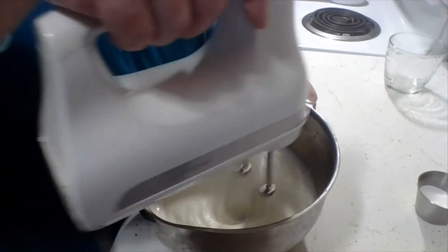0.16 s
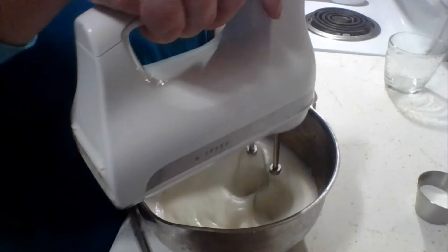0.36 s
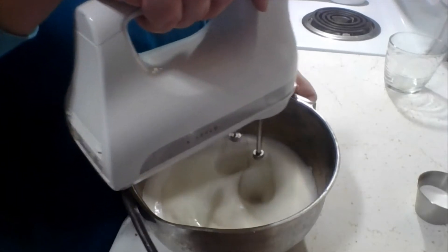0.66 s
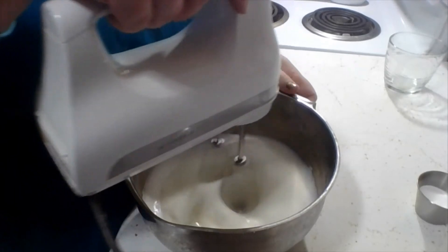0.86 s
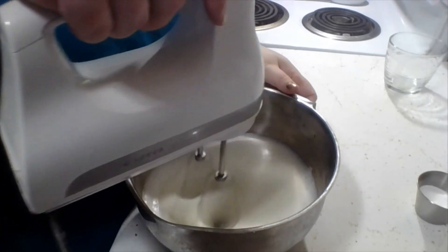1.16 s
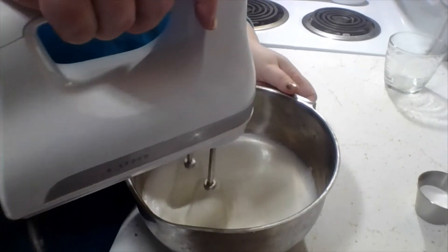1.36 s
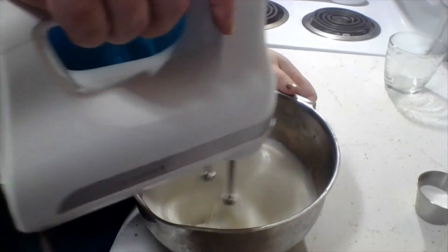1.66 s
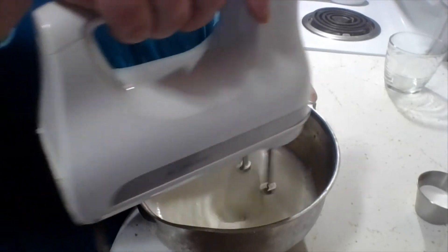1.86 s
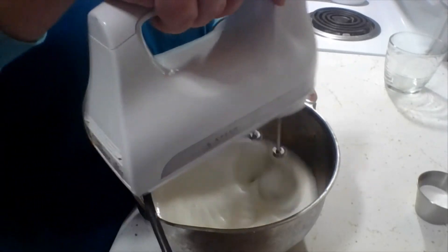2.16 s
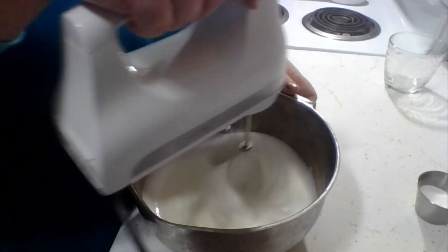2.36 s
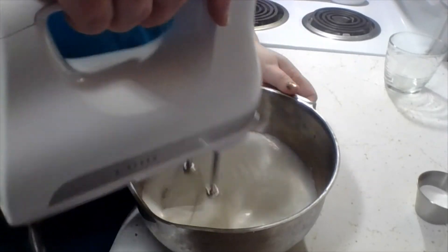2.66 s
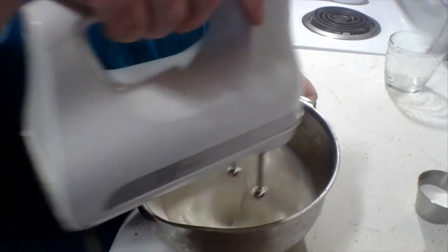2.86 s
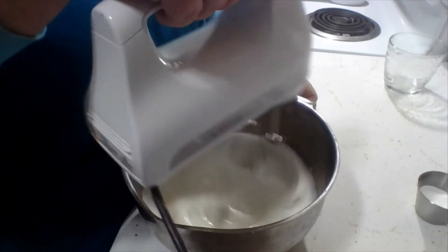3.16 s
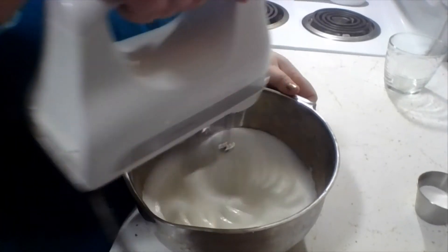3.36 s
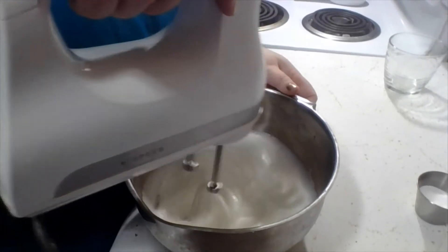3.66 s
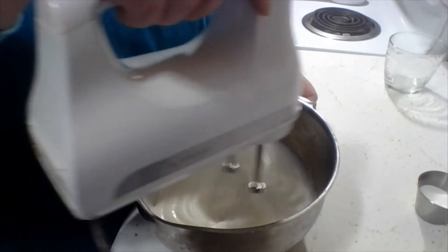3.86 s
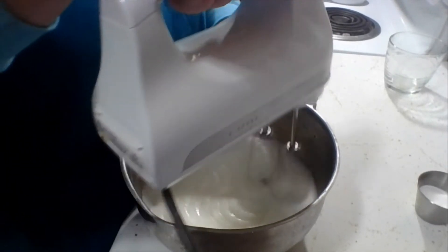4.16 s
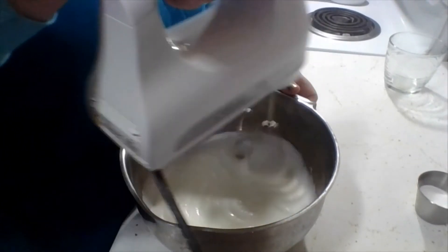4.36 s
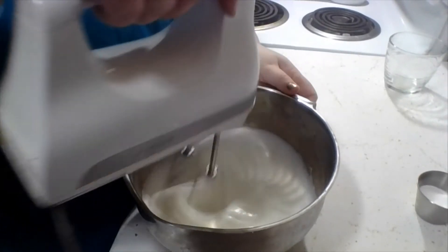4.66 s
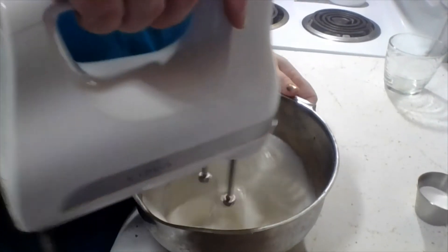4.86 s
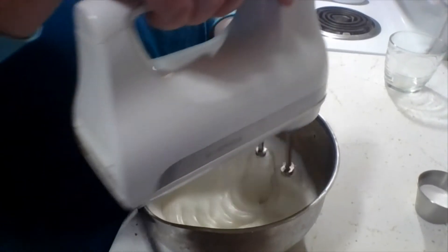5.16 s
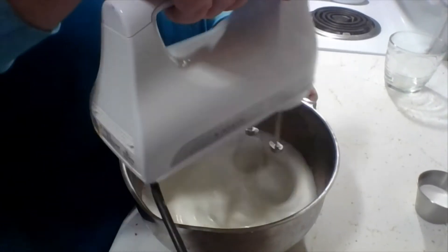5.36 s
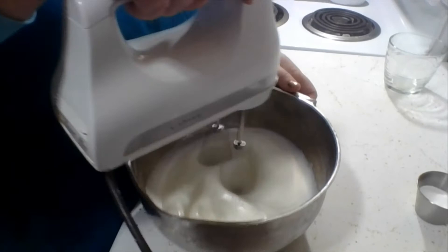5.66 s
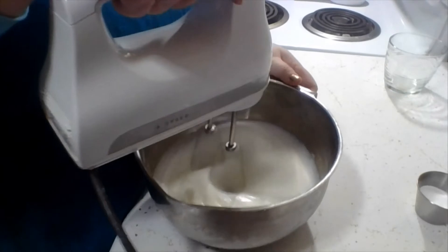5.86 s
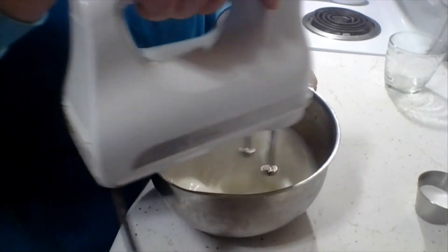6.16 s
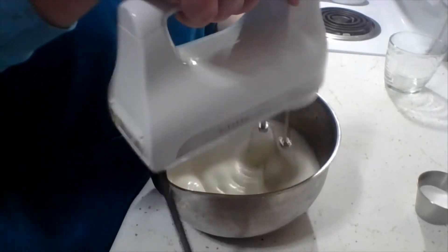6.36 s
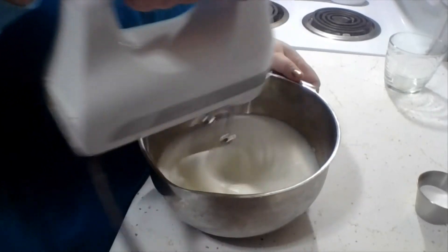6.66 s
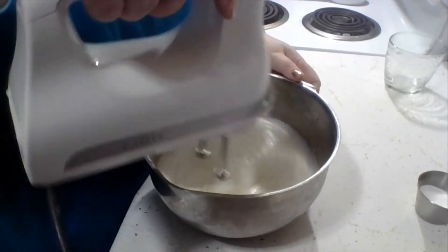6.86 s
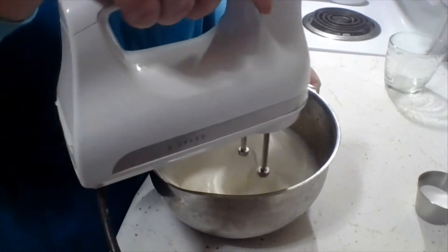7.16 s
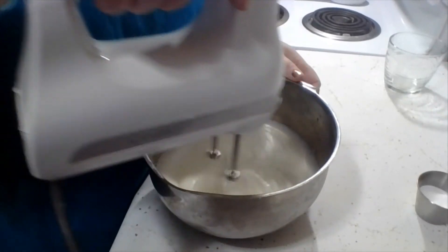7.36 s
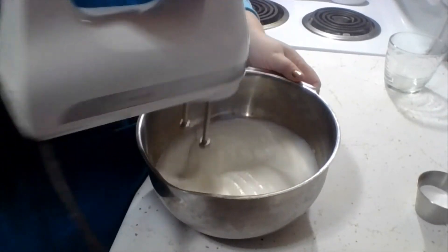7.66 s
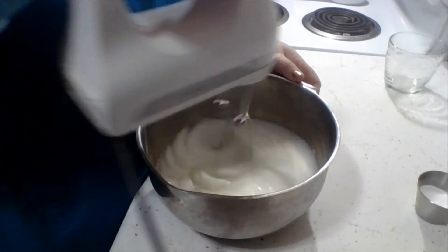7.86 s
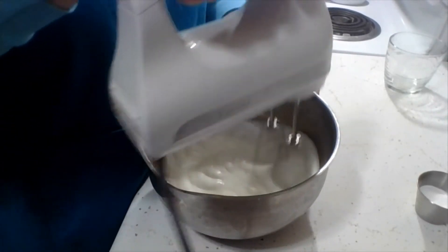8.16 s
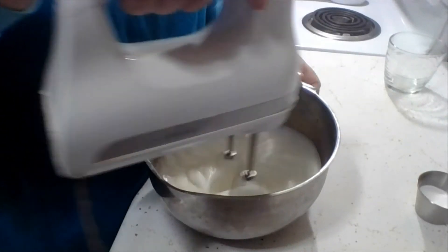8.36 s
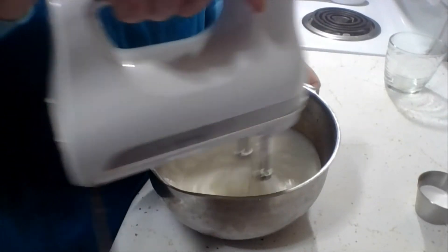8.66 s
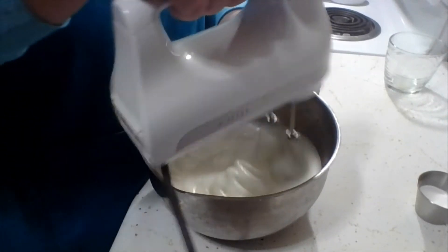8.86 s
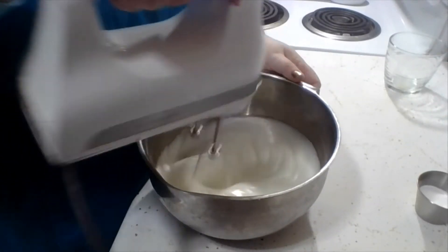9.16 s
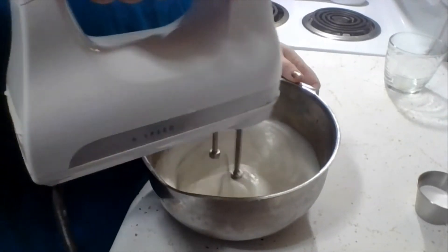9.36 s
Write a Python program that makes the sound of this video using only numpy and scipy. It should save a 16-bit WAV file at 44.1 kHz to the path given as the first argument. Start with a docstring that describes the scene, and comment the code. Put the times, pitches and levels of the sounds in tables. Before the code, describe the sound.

An electric hand mixer is already running and never stops through about 9.5 seconds: a trembling, buzzy motor whine, low hum with a strong high tone near 2.4 kHz, over gritty fan air, wavering slightly in pitch and level as it moves. From 0.3 to 1.3 seconds the beaters only brush the steel bowl in faint fluttering rubs. A sharp clank comes near 1.4, with scattered knocks through 2.3. From 2.8 to 4.3 metallic knocks and rattling scrapes crowd together; a brief lull follows until nearly 5. Then clanks, clicks and scrapes return, densest from 5.7 to 8.2, with a heavy bowl thump near 7.6. Around 8.45 a scrape squeals with several short ringing tones. Hard clanks at 9.0 to 9.4 close it, the mixer still running. Close, narrow-band microphone, clipped peaks, short kitchen reflections.

```python
"""Electric hand mixer in a steel bowl

An electric hand mixer whips a thin batter on a kitchen counter: its motor is a stack of trembling tones, its fan filtered grit.
Blades graze the bowl about twenty times a second or drag along it: bursts of tiny impacts played through the bowl's resonances.
Harder knocks clank and can overload the close microphone, soft pushes rock the bowl, and short rough tones glide over the scraping."""
import sys
import numpy as np
from scipy import signal
from scipy.fft import rfft, irfft
from scipy.io import wavfile
from scipy.ndimage import uniform_filter1d

SR = 44100
rng = np.random.default_rng(int(sys.argv[2]) if len(sys.argv) > 2 else 0)


def output_pcm(signal):
    """Save a mono or channel-first signal as 16-bit PCM at the path in sys.argv[1].

    Samples are clipped to [-1, 1] before scaling.
    """
    pcm = np.clip(np.atleast_2d(signal).T, -1, 1) * 32767
    wavfile.write(sys.argv[1], SR, np.round(pcm).astype(np.int16))


N = 419832
TIME = np.arange(N) / SR
RING_SAMPLES = 8192
HZ = np.maximum(np.arange(RING_SAMPLES // 2 + 1) * SR / RING_SAMPLES, 1)
MIC_TOP_HZ = 7520
# a short noisy swell of this length leads into each knock
SWELL_S = 0.02

# a blade hits the bowl squarely; levels are relative:
# time_s, clank_db, click_db, thud_db, clank_pitch_hz, brightness_db
KNOCKS = [(1.3789, 7.5, 11, -30, 1300, -0.5), (1.5816, -2.5, -9, -22, 1365, -5),
          (2.0771, -2, -4.0, -18.5, 2300, 0), (2.2644, -8.5, -8, -30, 1250, 0),
          (2.3125, 2.5, 2, -15, 1170, 4), (2.328, -2, -11, -16, 1100, -13), (2.8021, 4, 13.5, -11, 500, 6),
          (2.821, -5, -4, -23, 2380, -11), (2.8501, 1.5, 3, -12, 2291, 10),
          (2.9049, 1.5, -9, -26, 503, -17), (3.185, 4, -5, -26, 2290, 5.5),
          (3.2022, 6.5, -7, -16.5, 3210, -4), (3.235, 1.5, 0, -40, 3200, 2),
          (3.3889, 2, -8, -37, 2290, 1.5), (3.435, 3.5, -2, -3.5, 2150, 5.5), (3.538, 2.5, -6, -9, 500, -2),
          (3.837, -0.5, -8, -20, 520, -1), (3.891, -0.5, -7, -28, 1427, 1.5),
          (3.9341, -6.5, -12, -24, 2290, -2), (3.9809, -2, -12, -15, 2290, 1),
          (4.027, -4.5, -6, -25, 1300, -6), (4.074, -4.5, -10, -24, 2300, -2),
          (4.2249, 5, 13, -9.5, 834.5, -3), (4.2595, 6, -6, -8, 504, -8), (4.9685, 1, -5, -24, 2300, 6),
          (4.9823, 1, -5, -30, 925, 7), (5.005, -4, 4, -24, 1400, 2), (5.0635, -3, -8, -21, 502.3, -11),
          (5.103, 2, 3, -23, 800.5, 0.5), (5.1501, -0.5, -4.0, -29, 763, 17.5),
          (5.247, 3, -4, -15.5, 2770, 5.5), (5.6739, -3, -5, -18, 563, -6),
          (5.7158, -3, 2, -9.5, 496.7, -1), (5.769, -2.5, -1, -21, 670, -1),
          (5.8125, 7.5, -4, -17, 500, -10), (5.828, 2.5, 1.0, -23, 500, -4),
          (5.909, 1.5, -3, -25, 2410, 4.5), (6.1595, 4.5, 13.5, -20, 2650, 0),
          (6.2603, 2, 4, -17, 700, -10), (6.2777, -7, 5, -27, 3100, 8), (6.2994, 1, -1, -32, 500, -4),
          (6.3602, 3, 13.5, -8.5, 844, 4), (6.4063, 1, -11, -27, 500, -8),
          (6.5018, 3.5, -13, -22, 1120, -2), (6.551, 2.5, -5, -40, 1181, 6.5),
          (6.688, 2, 11, -22, 1015, -3), (6.7335, 4, 1, -5, 2200, 6), (6.748, 1.5, -1, -23, 1100, 3),
          (6.831, 0, 0, -26, 3050, 4), (6.9376, 0, -3, -19, 2292, 4), (6.9846, -2.5, 1, -28, 2286, 6),
          (7.0906, 2.5, 2, -28, 501.6, -7), (7.2421, 6, -7, -33, 500.5, -2), (7.4366, 2.5, 1, -34, 701, 3),
          (7.4767, 1.5, 14, -7, 1721, -2), (7.491, 1, -3, -20, 520, -8), (7.524, -1, -8, -13, 1150, 2),
          (7.5449, 5, -3, -10, 2289, 2), (7.619, 4, -13, -9.5, 2410, 7.5), (7.6666, 3.5, -2, -26, 1304, 4),
          (7.7749, -1, -11, -29, 2520, -10), (7.82, 0, -9, -17, 497, -1.5), (7.978, 6, 4.0, -6, 3200, -1),
          (8.0767, 5, 13, -19, 518, 0), (8.0848, 3, 6, -26, 2916, 4), (8.232, 4.5, 14, -13, 930, 0),
          (8.518, -3.5, -7, -4, 1241, 9), (8.5554, -6, -10, -24, 2190, 7),
          (8.6138, -3.5, -9, -14.5, 1380, -5), (8.6546, -3.5, 3, -30, 1360, 0),
          (9.0094, 4, 11, -18, 3270, 7), (9.0624, 7, 12.5, -1, 750, -10), (9.072, 4, 4, -4, 740, 0),
          (9.1747, 2.5, -3, -5.5, 520.1, -1), (9.3159, 0.2, -6, -17, 520, 0), (9.407, 8.5, 12, -5, 840, 1)]


def from_db(db):
    """Decibels to gain."""
    return 10 ** (np.asarray(db) / 20)


def rms_one(x):
    """Scaled to rms 1."""
    return x / np.sqrt(np.mean(x ** 2) + 1e-20)


def in_time(rows):
    """The columns of a curve, sample by sample."""
    s, *columns = np.transpose(rows)
    return [np.interp(TIME, s, column) for column in columns]


def at_hz(points):
    """A spectrum given by a few points, in dB along HZ."""
    hz, db = np.transpose(points)
    return np.interp(np.log(HZ), np.log(hz), db)


def drift(rate):
    """Smooth chance of spread 1 that changes about rate times a second."""
    return rms_one(np.interp(TIME * rate, np.arange(4096), rng.standard_normal(4096)))


def passed(x, hz, kind, order=2):
    """Butterworth filter."""
    return signal.sosfilt(signal.butter(order, hz, kind, fs=SR, output="sos"), x + 1e-18)


def body(db):
    """Impulse response of energy 1; minimum phase, so that resonances ring after the blow, never before."""
    db = db - 20 * np.log10(1 + (HZ / MIC_TOP_HZ / 1.1) ** 20)   # steep loss at the microphone's top
    cepstrum = irfft(db * np.log(10) / 20)
    response = irfft(np.exp(rfft(2 * cepstrum[:RING_SAMPLES // 2], RING_SAMPLES)))
    return response / np.linalg.norm(response)


def through(x, response):
    """A force played through an impulse response."""
    return signal.fftconvolve(x, response)[:N]


def add(out, s, sound):
    """Mixes a sound in, starting at time s."""
    start = round(s * SR)
    out[start:start + len(sound)] += sound


def motor_tones(speed, whine_db, flutter=0.002, rough=0.46, beamed_from=12):
    """Multiples of the turning rate tremble as the gears take up the load; high ones are beamed, low ones spread evenly."""
    # motor tones, before the whine level: multiple of the turning rate, level_db (rms)
    tones = [(1, -55.5), (2, -51.5), (3, -54.5), (4, -56), (5, -63), (6, -53.5), (7, -57), (9, -54),
             (12, -44.5), (14, -68.5), (16, -54.5), (18, -69), (24, -64), (36, -68.5)]
    angle = 2 * np.pi * np.cumsum(speed * (1 + flutter * drift(50))) / SR
    whine = 0
    for multiple, db in tones:
        level = from_db(db + whine_db * min(multiple / beamed_from, 1))
        tremble = 1 + rough * drift(45)
        whine = whine + level * tremble * np.sin(round(multiple) * angle)
    return np.sqrt(2) * whine


def chatter(per_s, spread_db):
    """Dense tiny impacts of uneven size and random sign, levelled to a steady mean force."""
    sizes = from_db(spread_db * np.minimum(rng.exponential(1, N), 4)) * rng.choice([-1, 1], N)
    impacts = sizes * (rng.random(N) < per_s / SR)
    return impacts / np.sqrt(np.maximum(uniform_filter1d(impacts ** 2, size=600), 1e-3))


def housing():
    """The response of the mixer's shell in dB: a broad curve with resonances and dead spots."""
    # fan air and brushes through the housing: frequency_hz, relative level_db (per Hz)
    air_curve = [(30, -36.5), (75, -12.5), (130, -19.5), (300, -16), (420, -2), (570, 0), (730, -20.5),
                 (900, -12), (1200, -6), (1700, -9.5), (2330, -2.5), (2550, -12), (2820, -16.5),
                 (3150, -4.5), (3700, -19.5), (7400, -23.5)]
    # the shell's resonances and dead spots: centre_hz, width_hz, gain_db
    shell_modes = [(1540, 50, 5.5), (1620, 60, -8), (2000, 87, 0), (2990, 100, 5), (3620, 69, 7),
                   (3690, 98, -11.5), (4650, 130, -7), (4730, 100, 4.5), (5300, 130, 6), (5900, 130, -3.5),
                   (6180, 130, 6.5), (6820, 90, -6.5)]
    hz, width, db = np.transpose(shell_modes)[:, :, None]
    return at_hz(air_curve) + np.sum(db / (1 + (2 * (HZ - hz) / width) ** 2), axis=0)


def fan(speed, fan_db, base_db=-38, blade_depth=0.13, throb_db=1.5, patchy_db=2.5, low_hz=800, high_hz=2000):
    """Gritty air and brush noise, pulsing with each turn and throbbing with the beaters."""
    turns = np.cumsum(speed) / SR
    beater_passes = turns * 4 / 39   # beater blades going by
    pulse = 1 + blade_depth * np.sin(2 * np.pi * turns)
    throb = from_db(throb_db * np.sin(2 * np.pi * beater_passes))
    grit = chatter(per_s=3500, spread_db=0.5) * pulse * throb
    # rumble, whir and hiss flicker each on their own
    rumble = passed(grit, low_hz, "low", order=1)
    whir = passed(grit - rumble, high_hz, "low", order=1)
    hiss = grit - rumble - whir
    air = sum(part * from_db(patchy_db * drift(45)) for part in (rumble, whir, hiss))
    return from_db(base_db + fan_db) * rms_one(through(air, body(housing())))


def contact_colours(count, ring_share, detune=0.0087):
    """The bowl's response in dB, one per contact: each spot wakes its own mix of modes; the moving batter detunes them."""
    # broad response of the filled bowl and the beaters: frequency_hz, relative level_db (per Hz)
    broad_curve = [(25, -11), (70, -4), (115, -2), (170, 4), (350, 5), (520, 11), (780, -3), (1250, 2),
                   (1700, -4), (2200, 2.5), (2700, -3), (3100, 2), (3700, -11.5), (5200, -6), (7300, -14)]
    # its clearest modes: centre_hz, width_hz, height_db above the broad response, before each contact's own mix
    clear_modes = [(74, 10, 9), (281.3, 15, 6), (451.8, 17, 9.5), (520, 24, 6), (611.6, 26, 6.5),
                   (913, 29, 4.5), (1186, 39, 6), (1300, 84, 4), (1490, 64, 9.5), (2006, 59, 6),
                   (2296, 29, 8), (2364, 84, 9), (3035, 34, 5.5), (3180, 14, 6), (3360, 250, 3),
                   (3612, 36, 6), (3920, 34, 11), (4170, 53, 5), (4376, 78, 9.5), (4970, 17, -2),
                   (5190, 51, 7.5), (5730, 42, 10), (6008, 59, 12), (6020, 39, 4.5), (6647, 150, 14),
                   (7050, 90, 9), (7232, 110, 11)]
    mode_spread, crowd_db, crowd_hz, uneven_db, uneven_hz = 0.3, 5.4, 70, 4.8, 230
    hz, width, db = np.transpose(clear_modes)[:, :, None]
    broad = at_hz(broad_curve)

    def modes():
        """The clear modes at this moment."""
        centre = hz * (1 + detune * rng.standard_normal(hz.shape))
        peaks = 10 * np.log10(1 + (from_db(db) ** 2 - 1) / (1 + (2 * (HZ - centre) / width) ** 2))
        return ring_share * rng.normal(1, mode_spread, len(peaks)) @ peaks

    def ripple(spacing_hz):
        """Smooth chance, changing every spacing_hz along the spectrum."""
        return np.interp(HZ / spacing_hz, np.arange(512), rng.standard_normal(512))

    # between the clear modes lies a crowd of weaker ones
    crowd = crowd_db * np.minimum(HZ / 400, 1)
    # random colour for each contact, more uneven towards the treble
    uneven = uneven_db * np.sqrt(np.minimum(HZ / 3500, 1))
    return [broad + modes() + crowd * ripple(crowd_hz) + uneven * ripple(uneven_hz) for _ in range(count)]


def blade_passes(blades_per_s=20.3, pass_s=0.023, usual_db=-18, pass_halves_db=34.5, bounce_db=-3.5, bounce_s=0.015):
    """While a rub lasts, blade after blade meets the wall, harder or softer as the hand leans in or lifts."""
    # the turning beaters are held against the wall; levels are before chance and bounce:
    # start_s, length_s, first_pass_db, last_pass_db, thud_db, clunk_db, brightness_db
    rubs = [(0.314, 0.16, -20, -24, 2.5, 4, -5), (0.548, 0.0515, -25.5, -22, -6, 8.5, 1),
            (0.746, 0.148, -28.5, -24, -7, -8.5, -9.5), (1.334, 0.038, -20.5, -22.5, 2.5, -8, -4.5),
            (1.54, 0.17, -21, -24.5, 1, 7, -1.5), (1.782, 0.1233, -27.5, -26, -11, -9.5, -9),
            (2.067, 0, -14.5, -20, -5, -10, -5.5), (2.269, 0, -19, -24, -2, -4, -5),
            (2.322, 0, -17, -17.5, 20, 11, 9), (2.35, 0, -27, -24, -2, 9, -16),
            (2.807, 0.0925, -13.5, -13, -12, 0, -11), (2.936, 0.17, -29, -23, -5, -11, -6),
            (3.196, 0.05, -8, -12.5, -6, -5.5, -8), (3.395, 0.16, -15, -25, 6, 7, -2),
            (3.6, 0.1, -26, -18.5, 3.5, 2.5, -0.5), (3.786, 0.094, -17.5, -14, 1.5, 7.5, 2),
            (3.931, 0.0874, -17.5, -13.5, -6, -4, -7), (4.072, 0.099, -20, -26.5, 5, -5, -0.5),
            (4.224, 0.041, -15.5, -13.5, -2, -6, 2), (4.519, 0.055, -19.5, -27, 17.5, 8.5, 8),
            (4.857, 0.0064, -27, -26, 17, 6, -15), (4.975, 0.182, -14, -23, -5, 2.5, 2.5),
            (5.208, 0.059, -18.5, -15, 9.5, 8.5, -1), (5.563, 0.025, -16.5, -29, 4.5, 3, 0.5),
            (5.673, 0.0395, -7.5, -9, 10, 8.5, 3), (5.764, 0.041, -11.5, -9.5, 2, 4.5, -3),
            (5.854, 0.054, -13, -15, -8, 2, -0.5), (5.961, 0.088, -19, -26.5, -2, 0.5, -3.5),
            (6.115, 0.094, -16.5, -21, -1, 1, -3), (6.257, 0.052, -15.5, -17, 0, 4.5, 8),
            (6.354, 0.045, -11.5, -9, 1.5, 1, -1), (6.454, 0.09, -21, -13, -18, -1, -5.5),
            (6.695, 0.047, -13.5, -11, 0, -10, -4), (6.787, 0.195, -19.5, -19, -3, 0, -1.5),
            (7.046, 0.049, -19, -10, 1.5, 7, -3), (7.139, 0.0963, -23, -14, -8, 4, -1),
            (7.289, 0.11, -15.5, -27, 5, 7, -1), (7.436, 0.04, -18, -9.5, -3, 2.5, 4.5),
            (7.523, 0.051, -9, -17.5, 10, -2.5, 5), (7.618, 0.035, -13.5, -18, -3, -11, -1.5),
            (7.716, 0.12, -17, -21, 1, -7.5, -4), (7.935, 0.0436, -17.5, -14.5, 8, 1.5, -1.5),
            (8.018, 0.0015, -17.5, -17, 12, 15, -7), (8.076, 0, -11, -12, -7, -4, 8.5),
            (8.183, 0.058, -19, -31, -12, -3.5, -3.5), (8.379, 0.12, -26, -16, 5, -2, -1.5),
            (8.55, 0.14, -25.5, -26, 10, 6.5, -13), (8.798, 0.073, -25.5, -32.5, 14, 7.5, 3),
            (8.974, 0.085, -19, -14.5, 4.5, 3, 1.5), (9.072, 0, -19, -10, -9, 0, -5),
            (9.124, 0.093, -15.5, -21, 10, 5.5, -7), (9.307, 0.019, -12, -19, 8.5, -2, -2.5),
            (9.409, 0.012, -12.5, -8, 16, -16, 0.5), (9.514, 0, -15.5, -23, -0.5, 8, 3)]
    rows = []
    for start, length, first_db, last_db, *tone_db in rubs:
        count = 1 + round(abs(length) * blades_per_s)
        times = np.linspace(start, start + length, count)
        for s, db in zip(times, np.linspace(first_db, last_db, count)):
            # a blade that knocks bounces off, so that the passes close to it are weaker
            near_knock = any(abs(s - knock[0]) < bounce_s for knock in KNOCKS)
            # a harder pass throws the blade off sooner
            duration = pass_s * 0.5 ** ((db - usual_db) / pass_halves_db)
            rows.append((s, duration, db + bounce_db * near_knock, *tone_db))
    # chance differences from one pass to the next: level 0.5 dB, each tone band 1.5 dB
    scatter = [0, 0, 0.5, 1.5, 1.5, 1.5]
    return np.array(rows) + scatter * rng.standard_normal(np.shape(rows))


def scrapes(rise_share=0.35, grab_db=3.5, thud_hz=220, clunk_hz=780, bright_hz=3600,
            thud_db=0, clunk_db=0, bright_db=0, ring_share=1.0):
    """Each blade pass or drag presses a burst of chatter into the bowl: it bites quickly and slides off slowly."""
    # a beater drags along the wall without lifting; levels are relative:
    # time_s, length_s, level_db, thud_db, clunk_db, brightness_db
    drags = [(1.568, 0.054, -22.5, 8, 5, 3), (2.818, 0.039, -26.5, -5, 1, -5),
             (2.908, .06, -26, 0, -8, -21), (3.485, 0.061, -23, -1, 10.5, -25),
             (3.838, 0.029, -21.5, -1, 4, -8), (4.007, 0.027, -17, -8, 4.5, -4),
             (5.001, 0.026, -20, -3, -6, 1), (5.08, 0.13, -26.5, -3, -1, -1),
             (5.295, 0.038, -28.5, -1, 10, -9), (6.225, 0.036, -23.5, 1, -2, -3),
             (6.287, 0.036, -22.5, -1, 1, 7), (7.215, 0.075, -30, -5, 12, 2),
             (7.738, 0.023, -21.5, -5, -9, -8), (8.424, 0.032, -23.5, -6, -6, 6),
             (8.482, 0.054, -20.5, -14, -15, 7), (8.54, 0.059, -23.5, 0, -13, 10),
             (8.606, 0.069, -23.5, 3, -6, 8), (9.15, 0.038, -17, 0, 7.5, 6)]
    out = np.zeros(N + SR)
    contacts = np.vstack([blade_passes(), drags])
    # the blade grabs and lets go as it slides
    impacts = chatter(per_s=2100, spread_db=3.0) * from_db(grab_db * drift(110))
    below_thud, below_clunk, below_bright = (1 / (1 + (HZ / hz) ** 6) for hz in (thud_hz, clunk_hz, bright_hz))
    colours = contact_colours(len(contacts), ring_share)
    for (s, length, db, thud, clunk, bright), colour in zip(contacts, colours):
        first, last = np.searchsorted(TIME, [s - length, s + 3 * length])
        progress = (TIME[first:last] - s) / length
        half_width = np.where(progress < 0, rise_share, 1 - rise_share)
        pressure = 0.5 ** ((progress / half_width) ** 2)
        # a heavy contact rocks the whole bowl, a light one only makes its wall sizzle
        weight = (thud + thud_db) * below_thud
        weight = weight + (clunk + clunk_db) * (below_clunk - below_thud)
        weight = weight + (bright + bright_db) * (1 - below_bright)
        sound = through(impacts[first:last] * np.sqrt(pressure), body(colour + weight))
        # the bowl gives back the energy that the blade put in
        add(out, first / SR, from_db(db) * sound * np.sqrt(pressure.sum()) / np.linalg.norm(sound))
    return out[:N]


def blow(swell_db=-22.5, swell_s=0.0077, rebound_db=-13.0, rebound_s=0.0036,
         rattle_db=-26, rattle_s=0.012, rattle_per_s=700):
    """The force of one knock, landing at SWELL_S: noise swells, the blade strikes, rebounds and rattles out in uneven taps."""
    t = TIME[:SR // 10] - SWELL_S
    grit, sizes = rng.standard_normal((2, len(t)))
    taps = sizes * (rng.random(len(t)) < rattle_per_s / SR) * np.sqrt(SR / rattle_per_s)
    swell = from_db(swell_db) * np.exp(-abs(t) / swell_s) * grit
    rebound = from_db(rebound_db) * np.exp(-abs(t) / rebound_s) * grit
    rattle = from_db(rattle_db) * np.exp(-abs(t) / rattle_s) * taps
    force = np.where(t < 0, swell, rebound + rattle)
    force[round(SWELL_S * SR)] = 1   # the strike itself
    return force


def knocks(crack_db=2.5, shove_db=0.5, shove_s=0.0014, lowest_hz=200, clank_db=7, clank_octaves=0.39,
           click_gain_db=2.5, click_hz=4000, bright_hz=3600, ring_share=0.85, full_clank_hz=780):
    """A sharp clank amid its chatter, a soft shove of the bowl against the counter and a short click."""
    out = np.zeros(N + SR)
    t = np.maximum(TIME[:SR // 10] - SWELL_S, 0)
    shove = t / shove_s * np.exp(1 - t / shove_s) / 2
    click = passed(1.0 * (TIME[:SR // 20] == 0), click_hz, "low", order=1)
    treble = 1 - 1 / (1 + (HZ / bright_hz) ** 6)
    colours = contact_colours(len(KNOCKS), ring_share)
    for (s, db, click_db, thud, hz, bright), colour in zip(KNOCKS, colours):
        crack = from_db(db + crack_db) * passed(blow(), lowest_hz, "high")
        force = crack - from_db(thud + shove_db) * shove
        # low-pitched clanks get less emphasis, as the bowl already rings there
        clank_height = clank_db * min(hz / full_clank_hz, 1) ** 3
        clank = clank_height * np.exp(-(np.log2(HZ / hz) / clank_octaves) ** 2)
        add(out, s - SWELL_S, through(force, body(colour + clank + bright * treble)))
        # a short click that drives the loudest peaks into clipping
        add(out, s, from_db(click_db + click_gain_db) * click)
    return out[:N]


def bumps(push_s=0.0011, ring_share=1.0):
    """The bowl rocks on the counter: each rock is one soft push that wakes mainly its low modes."""
    # rocks of the bowl: time_s, relative level_db
    rocks = [(1.538, -29), (3.455, -17), (3.549, -21), (4.771, -24.5), (5.27, -23), (6.203, -14),
             (7.035, -22), (7.142, -15.5), (7.579, 0.5), (7.841, -13), (8.387, -10.5), (8.712, -14),
             (8.973, -21), (9.22, -11), (9.254, -14)]
    out = np.zeros(N + SR)
    t = TIME[:SR // 20]
    push = t / push_s * np.exp(1 - t / push_s) / 2
    for (s, db), colour in zip(rocks, contact_colours(len(rocks), ring_share)):
        add(out, s, from_db(db) * through(push, body(colour)))
    return out[:N]


def gliding_tones(gain_db=0, fade_share=0.5, rough=0.55, wobble=0.012):
    """Short sine tones over the scraping, roughened by fast level drift, gliding and wobbling in pitch."""
    # short, rough gliding tones; level is before fades and the bowl's mix level:
    # start_s, length_s, first_pitch_hz, last_pitch_hz, level_db (rms)
    glides = [(2.327, 0.082, 1344, 1390, -34), (2.913, 0.085, 2250, 2325, -32),
              (3.693, 0.081, 3230, 3220, -35), (3.849, 0.17, 2320, 2290, -27),
              (6.147, 0.11, 2384, 2375, -23), (7.1, 0.16, 1510, 1490, -30.5),
              (7.252, 0.087, 2410, 2370, -34), (7.748, 0.065, 2345, 2350, -24),
              (8.45, 0.048, 1273, 1294, -26.5), (8.442, 0.076, 1985, 2000, -23),
              (8.45, .055, 2950, 2985, -26), (8.454, 0.1, 4360, 4340, -31), (8.458, 0.044, 5900, 5730, -27),
              (8.539, 0.12, 5940, 5985, -35), (8.545, .06, 3125, 3065, -35),
              (8.662, 0.097, 2345, 2345, -27), (9.058, 0.021, 838, 810, -15)]
    out = np.zeros(N + SR)
    roughness = 1 + rough * drift(170)
    bend = 1 + wobble * drift(120)
    for s, length, first_hz, last_hz, db in glides:
        first, last = np.searchsorted(TIME, [s, s + length])
        hz = np.geomspace(first_hz, last_hz, last - first) * bend[first:last]
        fades = signal.windows.tukey(last - first, fade_share)
        level = from_db(db + gain_db) * roughness[first:last] * fades
        add(out, s, np.sqrt(2) * level * np.sin(2 * np.pi * np.cumsum(hz) / SR))
    return out[:N]


def kitchen(x, wet_db=-8, first_echo_s=0.0041, wall_hz=4500, t60_s=0.12):
    """Counter, stove and walls return a short, duller tail of decaying noise."""
    t = TIME[:SR // 2]
    tail = rng.standard_normal(len(t)) * from_db(-60 * t / t60_s) * (t > first_echo_s)
    dull_tail = passed(tail / np.linalg.norm(tail), wall_hz, "low", order=1)
    return x + from_db(wet_db) * through(x, dull_tail)


def scene(bowl_db=-2.0):
    """Motor, fan and the rattling bowl, close to one microphone; only the bowl gets the kitchen's tail."""
    # the motor slows under load: time_s, speed (turns per s)
    speed_curve = [(0, 197.5), (.6, 197.1), (1.2, 198.05), (1.6, 198.15), (1.95, 198.9), (2.2, 198.4),
                   (2.65, 199.35), (3, 198.8), (3.55, 198.3), (3.75, 199.1), (4.35, 197.8), (4.6, 197.75),
                   (4.95, 197.3), (5.3, 195.8), (5.65, 197.2), (6.3, 198.45), (6.7, 198.4), (7.3, 197.7),
                   (7.8, 196.45), (8.35, 197.7), (8.8, 196.3), (9.52, 195.7)]
    # the housing turns towards and away from the microphone; levels are relative: time_s, whine_db, fan_db
    facing = [(0, 3.5, 4.5), (.55, 7.5, 3.5), (1.1, -2, 2), (1.65, 4.5, 4), (2.15, -2, 2.5), (2.55, 2, 3),
              (2.85, 7.5, 5.5), (3.35, -9, 5.5), (3.75, 5, 2.5), (4.3, 2, 3.5), (4.7, 2.5, 4.5),
              (5.1, 6.5, 2), (5.55, 4, 3), (6.1, 10, 2), (6.62, 2, 4), (7.2, 3.5, 6.5), (7.9, 2.5, -1.5),
              (8.3, 3, 8.5), (8.75, 2.5, 0), (9.1, -2, 10), (9.52, 1, 3)]
    speed, = in_time(speed_curve)
    whine_db, fan_db = in_time(facing)
    bowl = from_db(bowl_db) * (scrapes() + knocks() + bumps() + gliding_tones())
    return (kitchen(bowl) + motor_tones(speed, whine_db) + fan(speed, fan_db))[None]


def record(dry, cutoff_hz=15800):
    """A narrow-band microphone whose loudest peaks clip flat; then the top is cut."""
    narrow = signal.sosfilt(signal.ellip(12, 0.1, 90, MIC_TOP_HZ, fs=SR, output="sos"), dry)
    clipped = np.clip(narrow, -0.95, 0.95)
    return signal.sosfilt(signal.ellip(10, 0.1, 80, cutoff_hz, fs=SR, output="sos"), clipped)


dry = scene()
out = record(dry)
output_pcm(out)
```